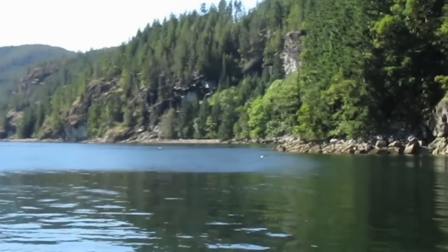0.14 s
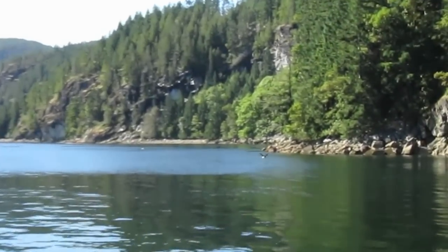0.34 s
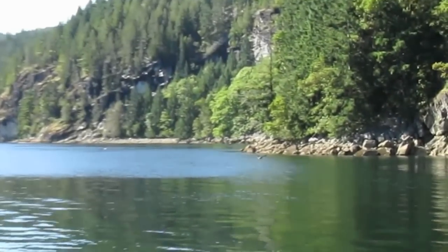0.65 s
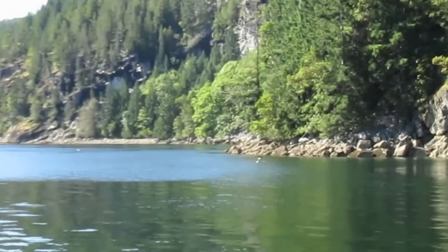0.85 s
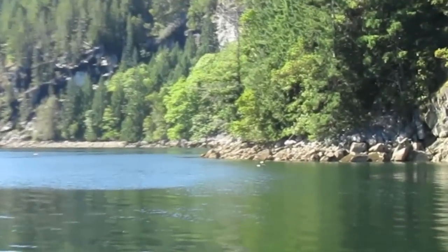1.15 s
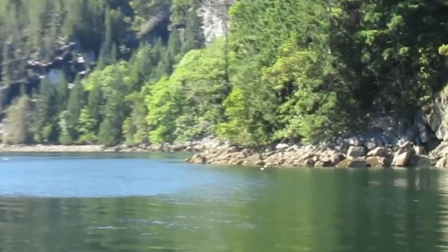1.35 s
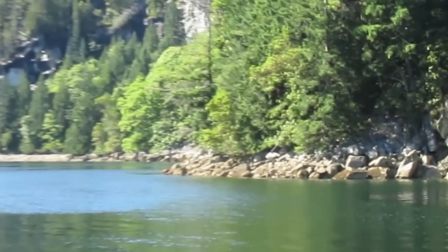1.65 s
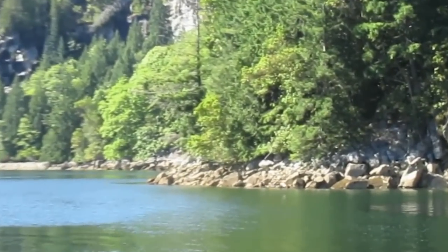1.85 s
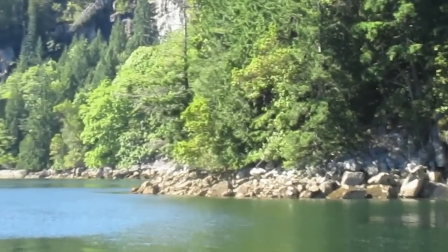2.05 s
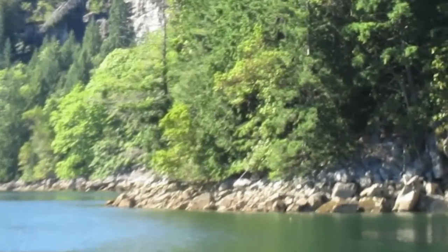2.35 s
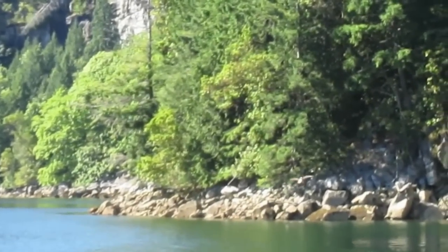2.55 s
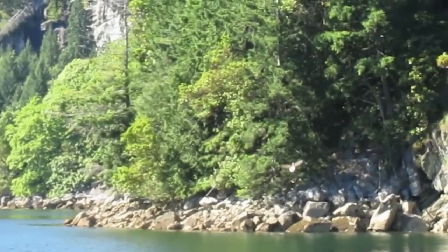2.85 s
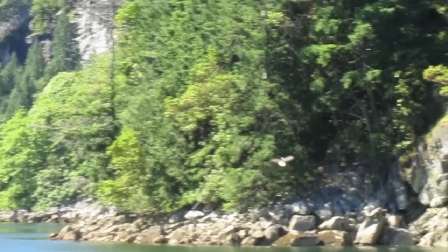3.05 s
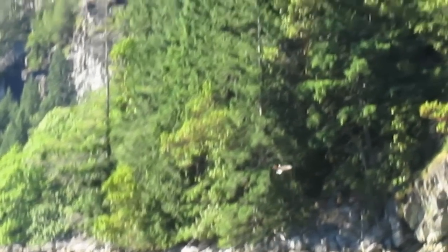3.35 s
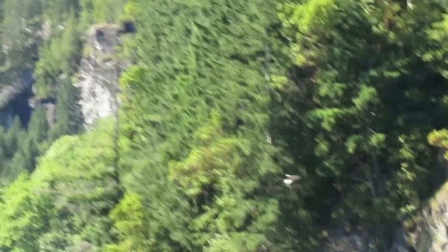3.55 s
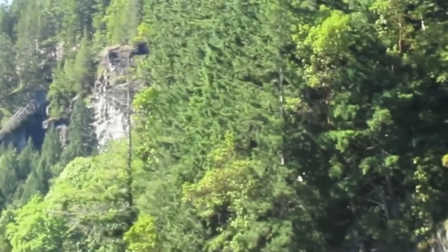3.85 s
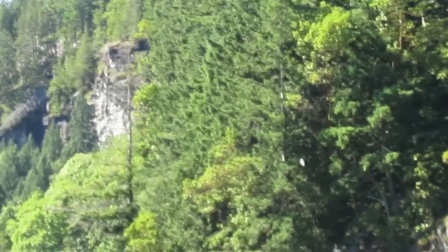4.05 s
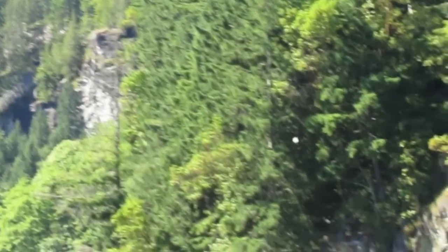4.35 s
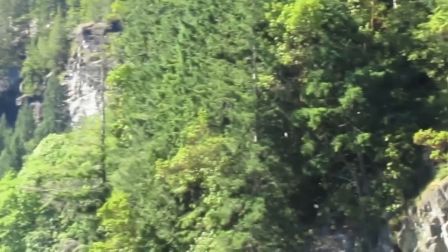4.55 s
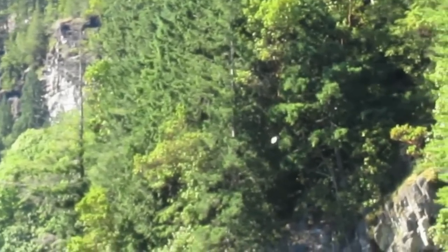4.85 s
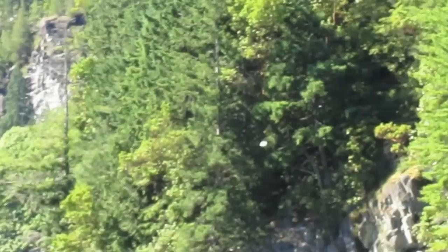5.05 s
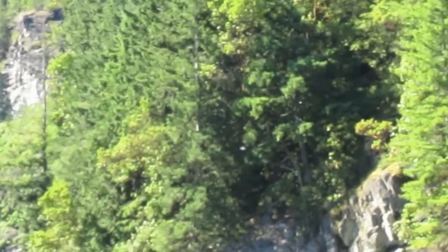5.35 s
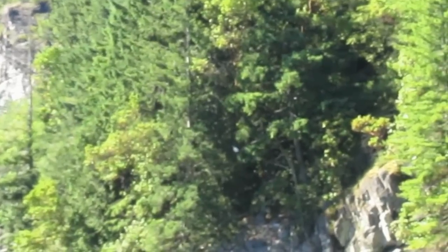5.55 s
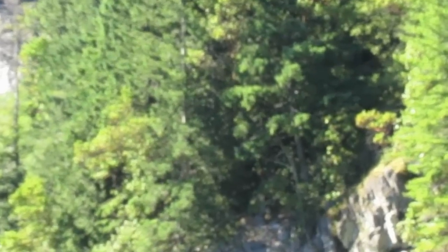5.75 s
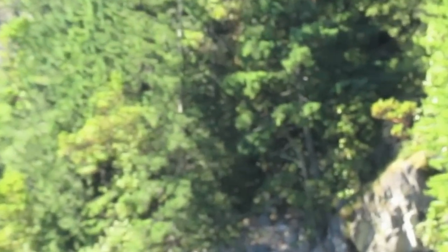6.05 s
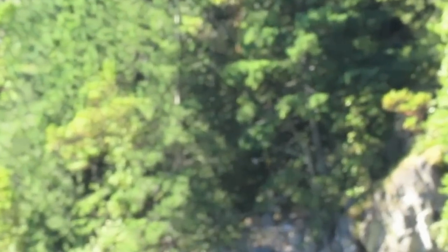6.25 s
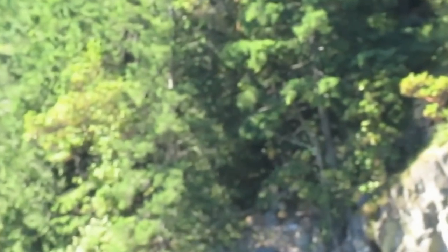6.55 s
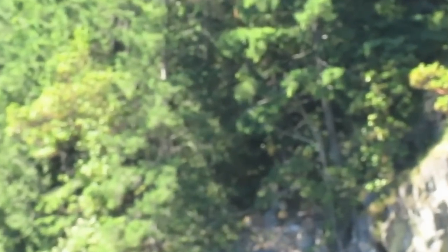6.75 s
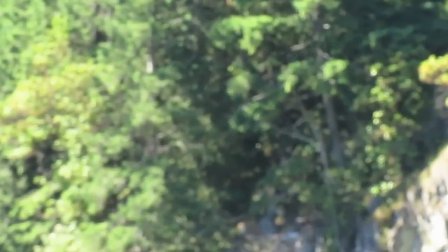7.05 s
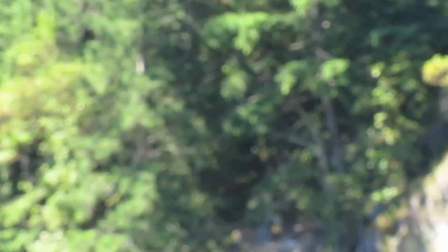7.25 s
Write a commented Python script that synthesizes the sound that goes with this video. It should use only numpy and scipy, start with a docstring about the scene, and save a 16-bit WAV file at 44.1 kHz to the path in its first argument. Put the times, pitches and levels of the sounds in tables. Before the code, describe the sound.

On a calm inlet, far eagles whistle and finally twitter rapidly while water plips, wind bumps the microphone and a camera motor whirrs and clicks.

```python
"""Afloat on a quiet inlet with a hand-held camera: water laps and plips, light wind rumbles in the two
microphone ports, and the zoom motor buzzes, its steps knocking the body, until about 2.5 s.
Far eagles pipe, yelp and wail in gliding whistles from the start, and wooded cliffs scatter them back.
The zoom lever, close to the right port, snaps and rings at 2.6 and 5.2 s; fingers rub the case.
The motor returns at 5.6 s, and the birds close with a twitter of quick pitch sweeps from 6.5 s."""
import sys
import numpy as np
from scipy import signal
from scipy.fft import rfft, irfft, next_fast_len
from scipy.io import wavfile
from scipy.ndimage import uniform_filter1d, map_coordinates

SR = 44100
rng = np.random.default_rng(int(sys.argv[2]) if len(sys.argv) > 2 else 0)


def dump_mix(stems):
    """Bounce the given channels to the path in sys.argv[1] as a 16-bit WAV at rate SR."""
    frames = np.atleast_2d(stems).T  # one column per channel
    limited = np.clip(frames, -1, 1)  # hard clip at full scale
    pcm = np.round(limited * 32767).astype(np.int16)
    wavfile.write(sys.argv[1], SR, pcm)


N = 326340

# Levels in dB are relative: each source is trimmed again where it is mixed.
# Water on the hull, single plips. Each row: start in seconds, starting pitch in Hz, level in dB.
PLIPS = [(.034, 714, -36.5), (0.033, 1270, -46), (2.404, 2130, -41), (2.673, 1190, -38.5),
         (2.827, 1840, -44), (2.915, 1970, -43.5), (3.538, 2580, -42), (4.638, 2050, -44),
         (5.016, 2160, -41.5), (5.188, 1600, -39.5), (4.605, 1094, -45.5), (5.188, 890, -42),
         (5.191, 2200, -44), (5.582, 1930, -41.5), (5.921, 1500, -46.5)]
# Spectrum of the rippling water. Each row: frequency in Hz, level in dB.
WATER_COLOUR = [(200, -44), (350, -9), (600, -3), (1130, 0), (2000, -2.5), (2870, -5), (3700, -14),
                (4120, -19), (4600, -12.5), (7300, -15.5), (11700, -30), (13200, -41), (15000, -57)]
# Swell of the lapping. Each row: time in seconds, level in dB.
LAPPING = [(0, -57), (1.2, -55.5), (2.5, -57), (3.2, -53), (5.5, -55), (5.7, -60.5), (6.3, -57.5),
           (7.4, -54)]
# Water between the two ports. Each row: frequency in Hz, left-right correlation from -1 to 1.
WATER_ALIKE = [(400, -0.67), (1300, 0.18), (2500, 0.22), (6000, 0.057), (12000, -0.42)]
# Steady wind at the ports. Each row: time in seconds, strength in dB.
WIND_STRENGTH = [(0, -46), (.6, -47), (.7, -43.5), (.98, -50.5), (1.07, -68.5), (1.17, -59.5),
                 (1.28, -58.5), (1.4, -74.5), (2.0, -62), (2.8, -70.5), (4.3, -67.5), (4.95, -55.5),
                 (5.5, -50), (5.72, -55), (6.35, -50), (7.0, -50), (7.4, -48.5)]
# Puffs that hit the ports. Each row: centre in seconds, length in seconds, level in dB.
PUFFS = [(0.153, 0.046, -53), (0.683, 0.024, -27), (0.76, 0.11, -35.5), (0.85, 0.14, -38),
         (0.979, 0.13, -35.5), (1.288, 0.046, -68), (1.982, 0.21, -47.5), (2.04, 0.043, -40),
         (2.416, 0.038, -48), (3.162, 0.091, -53), (3.467, 0.1, -63), (3.777, 0.12, -53), (4.04, 0.14, -60),
         (4.89, 0.12, -53), (5.26, .05, -45), (5.82, 0.088, -51), (5.97, 0.06, -57), (6.335, 0.035, -35),
         (6.714, 0.2, -57), (6.944, 0.042, -43), (7.171, 0.047, -40), (7.335, 0.23, -39)]
# Spectrum of the low buffets. Each row: frequency in Hz, level in dB.
BUFFET_COLOUR = [(20, -31), (40, -5.5), (75, 3), (130, -4), (220, -17.5), (400, -46), (2000, -95)]
# Spectrum of the softer rush. Each row: frequency in Hz, level in dB.
RUSH_COLOUR = [(100, -3), (230, 2), (350, -3.5), (600, -11), (1200, -17), (6000, -80)]
# Wind between the two ports. Each row: frequency in Hz, left-right correlation from -1 to 1.
WIND_ALIKE = [(100, -0.89), (300, -0.65), (700, -0.21)]

# Zooming at one speed. Each row: start in seconds, end in seconds, level in dB, knock of the steps in dB.
ZOOMS = [(0.019, 0.663, -57.5, -4), (0.657, 2.548, -51.5, -4.5), (5.612, 6.33, -57.5, -6.5),
         (6.334, 7.45, -54.5, -5.5)]
# Spectrum of the motor's knocks. Each row: frequency in Hz, level in dB.
KNOCK_COLOUR = [(500, -19), (1400, -18), (2050, 6), (3000, 1), (4200, -13), (6000, -16), (8000, -64),
                (13000, -60)]
# Spectrum of the rattling camera body. Each row: frequency in Hz, level in dB.
HOUSING = [(300, -31), (800, -7.5), (1500, -14), (1800, 0), (2040, -1), (2280, -8), (3000, -1.5),
           (3600, -3.5), (4250, -19), (4950, -5), (5400, -8), (5950, -3), (8000, -16.5), (10000, -16),
           (11200, -19.5), (12700, -15), (14500, -38)]
# Resonances of the zoom gears. Each row: centre in Hz, half-width in Hz, level in dB.
GEAR_WHINE = [(2023, 31, -9), (2386, 73, -15.5), (2950, 93, -15), (3500, 21, -24)]
# Lever ringing with a full clack. Each row: frequency in Hz, level in dB.
CLACK = [(300, -21.5), (1400, -17), (1950, 1.5), (2500, -3), (3150, -5.5), (4200, -25.5), (5200, -18),
         (5800, -8.5), (7400, -8), (8300, -28), (11500, -40), (13500, -36)]
# Lever ringing with a thin crack. Each row: frequency in Hz, level in dB.
CRACK = [(500, -21), (2000, -10.5), (2650, -0.5), (3900, -22.5), (5900, -1.5), (8600, -20.5), (10400, -23),
         (11200, -14), (13400, -14), (14000, -30)]
# Zoom lever snaps. Each row: start in seconds, level in dB, ring spectrum.
SNAPS = [(2.5699, 17, CLACK), (5.2365, 11.5, CRACK)]
# Lens ticks. Each row: start in seconds, level in dB.
TICKS = [(0.5399, -29), (1.044, -37), (1.1686, -41), (1.3668, -31.5), (1.894, -38.5), (1.9933, -38),
         (2.0937, -39.5), (2.13, -40), (2.193, -39.5), (5.2205, -40), (5.2469, -40), (2.404, -42),
         (6.29, -47)]
# Spectrum of the ticks. Each row: frequency in Hz, level in dB.
TICK_COLOUR = [(2000, -4), (4500, 0), (6000, 13.5), (10000, 3.5), (13000, -11), (16000, -26)]
# Finger rubs. Each row: start in seconds, length in seconds, level in dB, right over left in dB.
RUBS = [(2.625, 0.016, -54.5, 6), (3.955, 0.021, -43, 5), (3.97, 0.069, -56, 9), (4.997, 0.1, -56, 10),
        (5.042, 0.09, -53, 6.5), (5.57, 0.056, -47.5, -4.5), (3.104, .03, -59, 3), (6.258, 0.022, -52, -2)]
# Spectrum of the rubs. Each row: frequency in Hz, level in dB.
RUB_COLOUR = [(500, -12), (1500, -5), (2200, 3), (3200, -5), (4200, -12.5), (6500, -8), (9000, -18.5),
              (13000, -25), (16000, -46)]

# Decay of the shore's echo. Each row: frequency in Hz, time to fall 60 dB in seconds.
SHORE = [(500, 0.11), (3500, 0.77), (9000, 0.55)]
# Single cliff echoes. Each row: delay in seconds, level in dB.
CLIFFS = [(.11, -12.5), (.27, -23)]
# Yelps that lead up to a call. Each row: start in seconds, length in seconds, starting Hz, level in dB.
YELPS = [(0.225, 0.014, 1530, -58), (.249, 0.015, 2060, -54), (0.29, 0.017, 2430, -57),
         (.877, 0.015, 1496, -53), (.878, 0.023, 2400, -54), (2.637, 0.025, 2630, -62),
         (3.287, 0.031, 2420, -51), (3.314, 0.035, 2615, -56), (4.004, 0.021, 2200, -49),
         (4.012, 0.018, 1714, -49.5), (4.031, 0.017, 2380, -42), (4.048, 0.027, 2620, -44.5),
         (4.602, 0.012, 1535, -45.5), (4.656, 0.015, 2284, -48.5), (4.67, 0.013, 2370, -48),
         (5.145, .014, 2310, -56), (5.161, 0.04, 2564, -50.5)]
# Wails. Each row: whistle start in seconds, length in seconds, first Hz, last Hz, level in dB,
# high note length in seconds (0: no break), its Hz, its level in dB, echo level in dB.
WAILS = [ (0.966, 0.053, 3310, 3640, -56.5, 0.36, 4020, -67, -3),
         (1.59, 0.21, 3970, 4420, -67.5, 0.096, 4220, -65, 3),
         (2.073, .2, 3520, 3930, -75, 0.14, 4310, -65.5, 3.5),
         (2.646, 0.19, 3335, 3965, -59, 0.16, 4356, -54, 4),
         (3.328, 0.19, 3216, 3860, -51.5, 0.21, 4297, -50.5, 2),
         (4.061, .19, 3355, 3737, -46, 0.11, 4150, -60.5, -5),
         (4.685, 0.041, 3617, 3800, -44.5, 0, 4300, -70, 0.5),
         (5.177, 0.18, 3297, 3410, -53.5, 0.026, 4240, -74, 3)]
# Piping notes. Each row: start in seconds, length in seconds, first Hz, last Hz, level in dB.
PIPES = [(0.313, 0.025, 2990, 3370, -55.5), (0.359, 0.045, 3415, 3110, -54.5),
         (0.447, 0.034, 3090, 3290, -55), (0.485, 0.03, 3330, 3590, -63), (0.546, 0.062, 3530, 3700, -60),
         (0.668, 0.11, 3480, 3520, -60), (0.899, 0.021, 3090, 3320, -51.5), (2.622, .016, 3120, 3300, -60),
         (2.66, 0.091, 2770, 2840, -61.5), (3.321, 0.13, 2670, 2775, -58), (1.147, 0.11, 3700, 3920, -66),
         (3.689, 0.076, 5410, 5420, -59.5), (5.266, 0.028, 2560, 2770, -42),
         (5.299, .036, 2756, 2885, -46.5), (5.374, .1, 3387, 3595, -53), (5.418, 0.059, 4210, 4340, -61),
         (5.804, 0.029, 2650, 2780, -53), (5.834, 0.033, 2717, 2762, -43.5),
         (5.895, 0.067, 3400, 3200, -64), (5.962, 0.061, 3720, 4180, -70), (5.99, 0.027, 1970, 2206, -49),
         (6.36, 0.18, 5080, 5160, -67)]
# Twitter. Each row: start in seconds, length in seconds, first Hz, last Hz, level in dB, hoarseness 0 to 1.
TWITTER = [(6.52, 0.026, 3700, 4700, -63, 0.8), (6.611, 0.031, 4500, 3200, -63, 0.8),
           (6.643, 0.031, 2415, 3160, -48.5, 0.45), (6.699, 0.019, 3090, 2780, -43, 0.1),
           (6.845, 0.018, 2296, 1930, -52, 0.2), (6.855, 0.033, 3750, 5430, -62, 0.3),
           (6.886, 0.06, 5430, 5860, -51.5, 0.28), (6.944, .014, 3300, 4100, -57, .5),
           (6.954, 0.015, 5030, 3500, -58, 0.5), (6.972, 0.018, 2890, 2970, -49, 0.2),
           (6.974, 0.015, 4130, 5100, -59, 0.7), (6.996, .014, 5120, 4100, -53, 0.8),
           (7.018, .014, 3920, 4970, -56, 0.9), (7.025, .044, 5580, 5200, -51.5, 0.45),
           (7.063, 0.0206, 5430, 4890, -49, .5), (7.073, 0.025, 4650, 4790, -51, .4),
           (7.136, .014, 4540, 5900, -56, .7), (7.101, 0.015, 6350, 6150, -52, 0.65),
           (7.102, 0.023, 5880, 4670, -53, 0.5), (7.177, 0.02, 6500, 3850, -52, 0.52),
           (7.192, 0.0087, 2970, 3350, -43.5, 0.6), (7.207, 0.017, 3750, 4100, -52, 0.7)]
# Whistle that lifts, lingers, lifts again.
# Each row, at even steps through the note: share of the pitch glide, level in dB.
CLIMB = [(-.05, -6), (0.319, 3), (.38, -2), (.42, -4), (.68, -1), (.92, -2.5), (1, 1)]
# Glide quick at first, then levelling off. Each row: share of the pitch glide, level in dB.
ARCH = [(0, -0.5), (.45, 0), (.68, -1), (.86, 1.5), (1, 3.5)]
# Nearly straight glide. Each row: share of the pitch glide, level in dB.
SWEEP = [(0, -0.45), (.45, 0.18), (1, -0.8)]
# High note that slides in softly from below. Each row: share of the pitch glide, level in dB.
HIGH = [(-.2, -8), (.45, -1), (.7, 2.5), (.88, 1.5), (1, -1)]

ZOOM_RAMP_S, ZOOM_EASE_DB_PER_S = 0.075, 2.5  # the motor fades on and off, and quietens as it runs
HIGH_RISE, HIGH_SETTLE_S = .095, 0.1125  # the longer a high note, the nearer its climb gets to this share
HIGH_OVERLAP_S = .016  # the high note sets in just before the whistle ends
YELP_RISE_HZ_PER_S = 11700
WAIL_HOARSE, YELP_HOARSE, PIPE_HOARSE = 0.32, 0.55, 0.18  # 0 to 1
PIPE_ECHO_DB, TWITTER_ECHO_DB = -4, -7.5
NOTE_ATTACK_S, NOTE_ATTACK_SHARE, NOTE_RELEASE_S = 0.0026, 0.069, 0.0079  # longer notes swell more slowly
TOP_HZ = 13900


def amp(db):
    """Decibels to gain."""
    return 10 ** (np.asarray(db) / 20)


def unit(x):
    """Scaled to rms 1."""
    return x / np.sqrt(np.mean(x ** 2) + 1e-20)


def along(points, hz):
    """(Hz, value) points read on a log axis."""
    f, v = np.transpose(points)
    return np.interp(np.log(hz + 1), np.log(f), v)


def curve(rows):
    """(seconds, value) rows as one value per sample."""
    return np.interp(np.arange(N) / SR, *np.transpose(rows))


def wobble(rate):
    """A smooth random curve, rate knots a second."""
    knots = rng.standard_normal(int(N * rate / SR) + 4)
    return map_coordinates(knots, [np.arange(N) * rate / SR])


def filtered(x, response):
    """x times a response of frequency."""
    m = next_fast_len(N + SR // 2)
    return irfft(rfft(x, m) * response(np.fft.rfftfreq(m, 1 / SR)), m)[..., :N]


def coloured(x, spectrum):
    """x through a (Hz, dB) spectrum, at rms 1."""
    return unit(filtered(x, lambda hz: amp(along(spectrum, hz))))


def stereo_noise(spectrum, alike):
    """Coloured noise at two ports; the mid-side balance sets their correlation at each frequency."""
    def mid_side(hz):
        turn = np.arccos(np.clip(along(alike, hz), -1, 1)) / 2
        return amp(along(spectrum, hz)) * [np.cos(turn), np.sin(turn)]

    mid, side = filtered(rng.standard_normal((2, N)), mid_side)
    return unit(np.array([mid + side, mid - side]))


def pan(right_db):
    """Left and right gains."""
    return amp([[-right_db / 2], [right_db / 2]])


def add(track, s, sound):
    """Mix a sound into a track at time s."""
    i = max(round(s * SR), 0)
    n = min(sound.shape[-1], N - i)
    track[..., i:i + n] += sound[..., :n]


def water(plip_t60=0.013, rise=4.1):
    """A soft wash of ripples, with single bubbles that rise in pitch as they ring out."""
    plips, t = np.zeros(N), np.arange(SR // 20) / SR
    for s, hz, db in PLIPS:
        envelope = amp(db - 60 * t / plip_t60) * (1 - np.exp(-t / 0.00048))
        add(plips, s, envelope * 2 * np.sin(2 * np.pi * hz * t * (1 + rise * t)))
    swell_db = .6 * wobble(8) + .9 * wobble(70)
    return plips + amp(curve(LAPPING) + swell_db) * stereo_noise(WATER_COLOUR, WATER_ALIKE)


def wind(buffet_db=-4.0, rush_db=-1, lumps_db=4.5, puff_rush_db=-19, flicker_db=1.3):
    """Wind and its puffs press on the ports, mostly in opposite senses: low buffets under a softer rush."""
    strength, puffs = amp(curve(WIND_STRENGTH)), np.zeros(N)
    for s, length, db in PUFFS:
        add(puffs, s - length / 2, amp(db) * signal.windows.hann(round(length * SR)))
    buffet_gain = strength * amp(buffet_db + lumps_db * wobble(18)) + puffs
    rush_gain = strength * amp(rush_db + flicker_db * wobble(14)) + amp(puff_rush_db) * puffs
    buffets = buffet_gain * stereo_noise(BUFFET_COLOUR, WIND_ALIKE)
    return buffets + rush_gain * stereo_noise(RUSH_COLOUR, WIND_ALIKE)


def zoom_drive():
    """The motor's loudness: on for each stretch, easing as it runs."""
    t, drive = np.arange(N) / SR, np.zeros(N)
    for start, end, db, _ in ZOOMS:
        running = (t >= start) & (t < end)
        drive += amp(db - ZOOM_EASE_DB_PER_S * (t - start)) * running
    return uniform_filter1d(drive, round(ZOOM_RAMP_S * SR))


def gears():
    """The turning gears keep a few narrow resonances singing."""
    whine = np.zeros((2, N))
    for hz, width, db in GEAR_WHINE:
        noise = rng.standard_normal((2, N))
        whine += amp(db) * unit(filtered(noise, lambda f: 1 / (1 + ((f - hz) / width) ** 2)))
    return whine


def zoom_motor(step_hz=179.9, decay_s=0.0008, rattle_db=-4.0, whirr=0.56, shared=0.05, uneven=0.025):
    """Each motor step knocks the housing and shakes out a short rattle, over the whine of the gears."""
    steps = np.cumsum(step_hz * (1 + .0015 * wobble(12))) / SR + uneven * wobble(160)
    age = steps % 1 / step_hz  # seconds since the last step
    blows = np.diff(np.floor(steps), prepend=0) * amp(0.35 * wobble(150))
    knocks = coloured(blows, KNOCK_COLOUR)
    knock_db = curve([(s, db) for start, end, _, db in ZOOMS for s in (start + ZOOM_RAMP_S, end)])
    noise = rng.standard_normal((3, N))
    rattle = coloured((noise[:2] + shared * noise[2]) * (np.exp(-age / decay_s) + whirr), HOUSING)
    motor = amp(knock_db) * knocks + amp(rattle_db) * rattle + gears()
    return zoom_drive() * motor * pan(right_db=-4.0)


def lens_ticks(gain_db=-5, t60=0.0067):
    """Tiny bright ticks from the moving lens barrel: short bursts of dying noise."""
    out, t = np.zeros((2, N)), np.arange(SR // 100) / SR
    for s, db in TICKS:
        add(out, s, amp(db + gain_db - 60 * t / t60) * rng.standard_normal((2, len(t))))
    return filtered(out, lambda hz: amp(along(TICK_COLOUR, hz)))


def fingers(grain_db=1.0):
    """Short grainy rubs on the camera case."""
    pressure = np.zeros((2, N))
    for s, length, db, right_db in RUBS:
        add(pressure, s, amp(db) * pan(right_db) * signal.windows.tukey(round(length * SR), .6))
    return pressure * coloured(rng.standard_normal((2, N)) * amp(grain_db * wobble(700)), RUB_COLOUR)


def click(spectrum, size=2048):
    """One sharp blow's ring with a given spectrum; minimum phase, so it starts at once and dies away."""
    cepstrum = irfft(np.log(amp(along(spectrum, np.fft.rfftfreq(size, 1 / SR)))))
    cepstrum[1:size // 2] *= 2
    cepstrum[size // 2 + 1:] = 0
    return irfft(np.exp(rfft(cepstrum)))


def lever(left_db=-13, far_lag_s=.00004):
    """The plastic lever snaps home beside the right port; the left port hears it weaker and later."""
    out = np.zeros((2, N))
    for s, db, colour in SNAPS:
        ring = amp(db) * click(colour)
        add(out[1], s, ring)
        add(out[0], s + far_lag_s, amp(left_db) * ring)
    return out


def shore(x, build_s=0.018, tail_db=-4, spread=0.14):
    """The forest scatters a long tail, mostly from ahead; each cliff returns a later echo."""
    hz, t, z = signal.stft(rng.standard_normal((2, SR)), SR, nperseg=256)
    decay = amp(-60 * t / along(SHORE, hz)[:, None])
    tail = signal.istft(z * decay * (1 - np.exp(-t / build_s)), SR, nperseg=256)[1]
    tail *= amp(tail_db) / np.linalg.norm(tail[0])
    for s, db in CLIFFS:
        tail[0, round(s * SR)] += amp(db)
    mid, side = signal.fftconvolve(x[None], tail, axes=1)[:, :N]
    return np.array([mid + spread * side, mid - spread * side])


def off_the_water(x, delay_s=.013, bounce_db=-9.5):
    """The calm surface returns each note a moment later; on glides the two paths beat."""
    return x + amp(bounce_db) * filtered(x, lambda hz: np.exp(-2j * np.pi * hz * delay_s))


def sing(notes, jitter=0.01, rasp=0.038, flutter_db=2.0, overtone_db=-17):
    """Each note is a nearly pure whistle gliding along a shape; a hoarse throat shakes its pitch."""
    voice = np.zeros(N)
    waver, shake, flutter = wobble(90), wobble(600), amp(flutter_db * wobble(90))
    for start, length, first, last, db, shape, hoarse in notes:
        i = np.arange(round(start * SR), round((start + max(length, .01)) * SR))
        through, knots = np.linspace(0, 1, len(i)), np.linspace(0, 1, len(shape))
        glide, effort_db = (np.interp(through, knots, column) for column in np.transpose(shape))
        hz = first + (last - first) * glide
        hz *= 1 + jitter * waver[i] + 2 * rasp * np.clip(hoarse, 0, 1) ** 2 * shake[i]
        phase = 2 * np.pi * np.cumsum(hz) / SR
        attack = NOTE_ATTACK_S + NOTE_ATTACK_SHARE * length
        fade_in, fade_out = (i - i[0]) / SR / attack, (i[-1] - i) / SR / NOTE_RELEASE_S
        swell = np.clip(np.minimum(fade_in, fade_out), 0, 1)
        # the overtone is strongest where it meets the throat's resonance
        overtone = amp(overtone_db) / (1 + ((2 * hz - 5500) / 600) ** 2)
        whistle = np.sin(phase) + overtone * np.sin(2 * phase)
        add(voice, start, amp(db + effort_db) * np.sqrt(2) * swell * flutter[i] * whistle)
    return voice


def yelps():
    """Before the whistle catches, the voice stutters upward in short hoarse yelps."""
    return sing([(s, length, hz, hz + YELP_RISE_HZ_PER_S * length, db, SWEEP, YELP_HOARSE)
                 for s, length, hz, db in YELPS])


def wails():
    """The voice climbs and breaks to a higher note, or just levels off on its whistle."""
    notes = []
    for s, length, first, last, db, high_s, high_hz, high_db, _ in WAILS:
        notes.append((s, length, first, last, db, CLIMB if high_s > 0 else ARCH, WAIL_HOARSE))
        if high_s > 0:
            top_hz = high_hz * (1 + HIGH_RISE * (1 - np.exp(-high_s / HIGH_SETTLE_S)))
            high_start = s + length - HIGH_OVERLAP_S
            notes.append((high_start, high_s, high_hz, top_hz, high_db, HIGH, WAIL_HOARSE))
    return sing(notes)


def eagles():
    """Wails, pipes and twitter come over the water, and the shore answers each."""
    wail = off_the_water(wails() + yelps())
    pipe = off_the_water(sing([(*note, ARCH, PIPE_HOARSE) for note in PIPES]))
    twitter = off_the_water(sing([(*note, SWEEP, hoarse) for *note, hoarse in TWITTER]))
    wail_echo_db = curve([(row[0], row[-1]) for row in WAILS])
    to_shore = amp(wail_echo_db) * wail + amp(PIPE_ECHO_DB) * pipe + amp(TWITTER_ECHO_DB) * twitter
    return wail + pipe + twitter + shore(to_shore)


def scene():
    """Water and wind around the boat, the camera's noises at the ports, and the far birds with their echo."""
    camera = zoom_motor() + lens_ticks() + fingers() + lever()
    birds = amp(-2.5) * eagles() * pan(right_db=1.2)
    return water() + wind() + camera + birds


def record(dry):
    """The camera keeps next to nothing above its steep band limit."""
    return filtered(dry, lambda hz: 1 / np.sqrt(1 + (hz / TOP_HZ) ** 80))


dry = scene()
out = record(dry)
dump_mix(out)
```